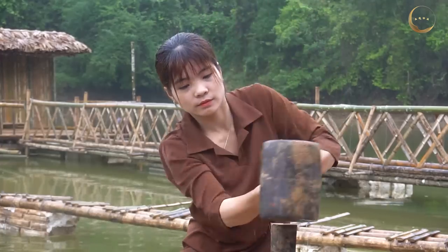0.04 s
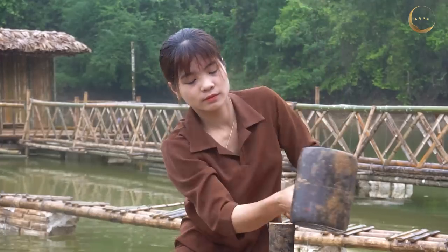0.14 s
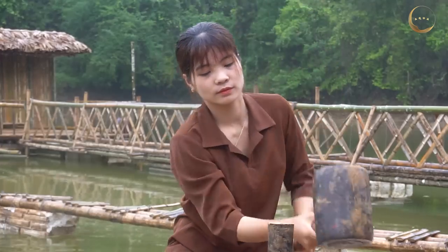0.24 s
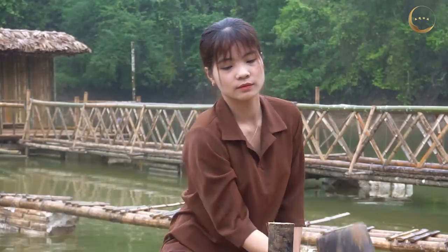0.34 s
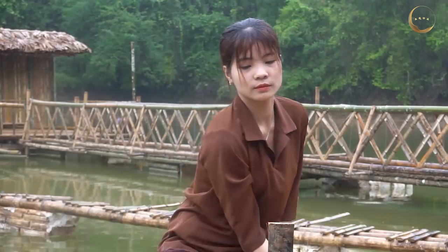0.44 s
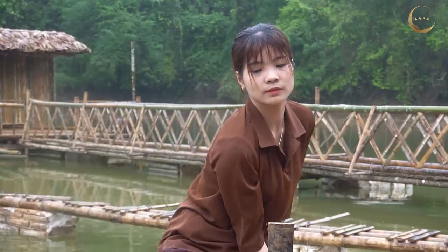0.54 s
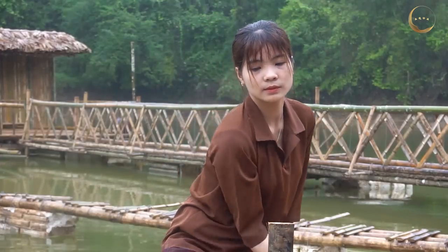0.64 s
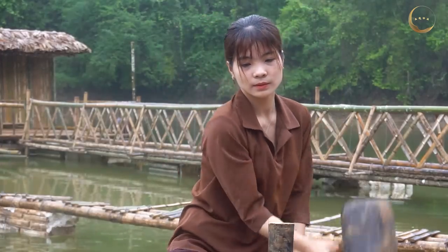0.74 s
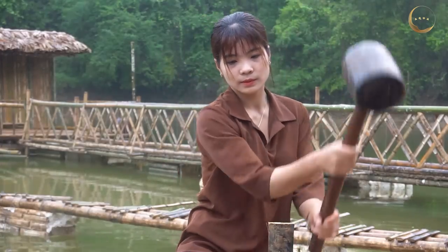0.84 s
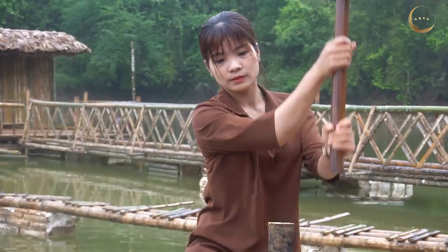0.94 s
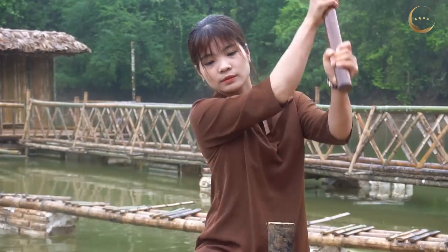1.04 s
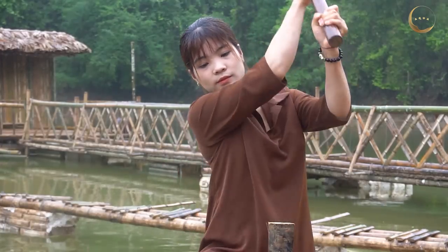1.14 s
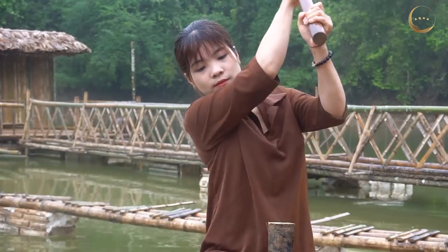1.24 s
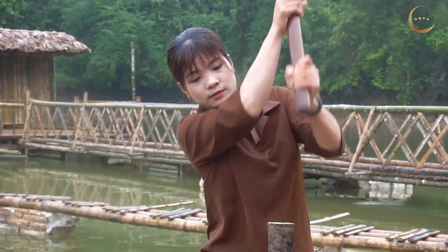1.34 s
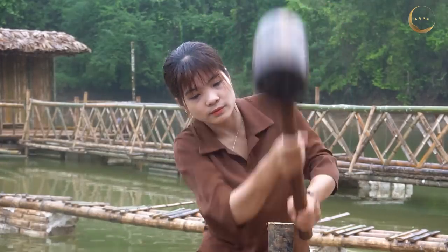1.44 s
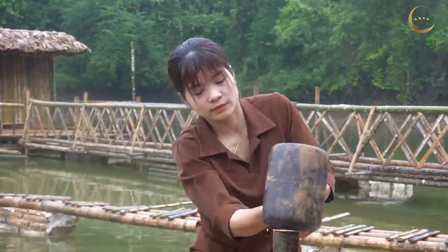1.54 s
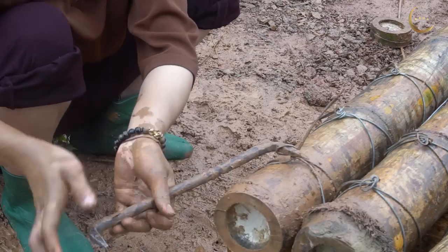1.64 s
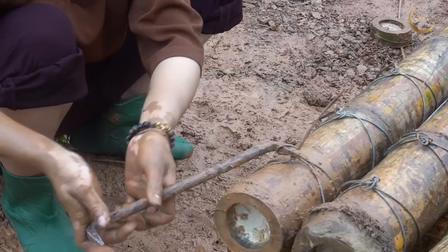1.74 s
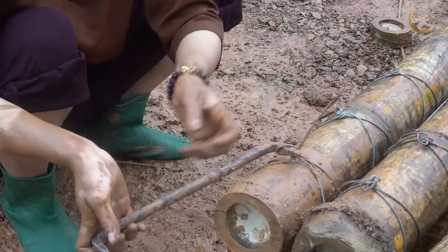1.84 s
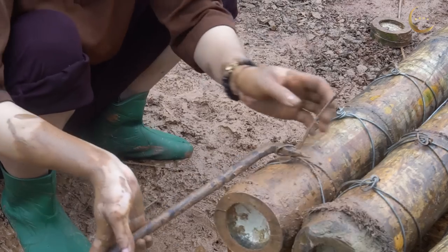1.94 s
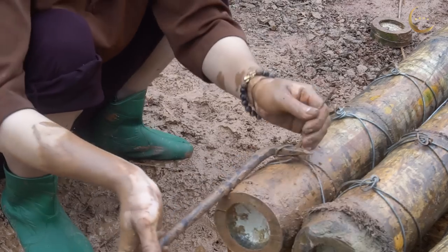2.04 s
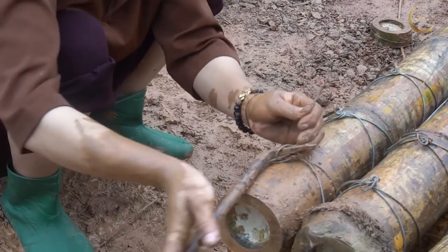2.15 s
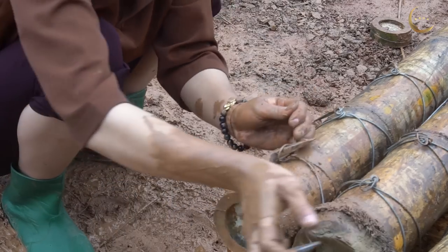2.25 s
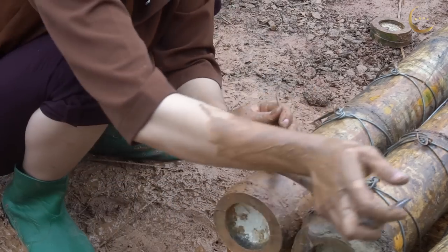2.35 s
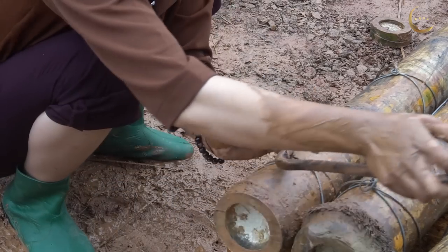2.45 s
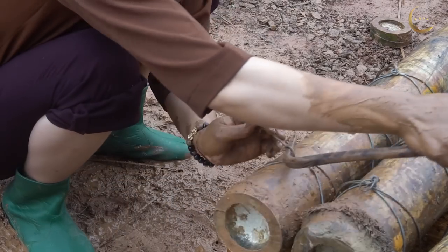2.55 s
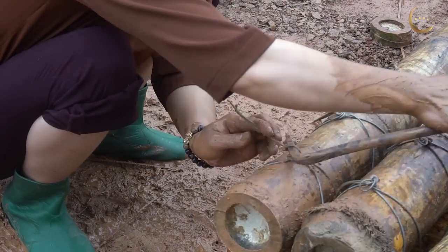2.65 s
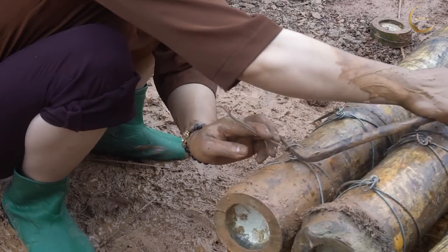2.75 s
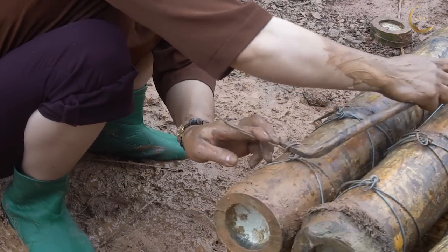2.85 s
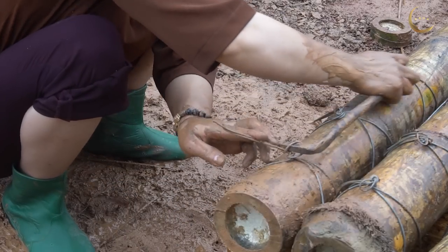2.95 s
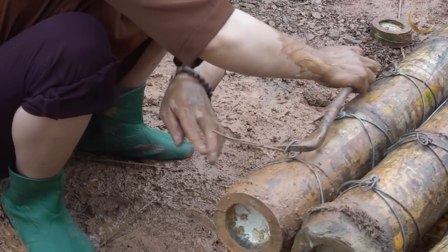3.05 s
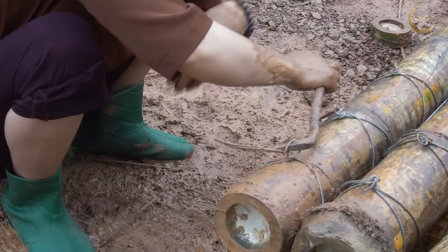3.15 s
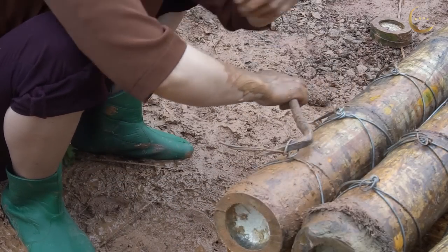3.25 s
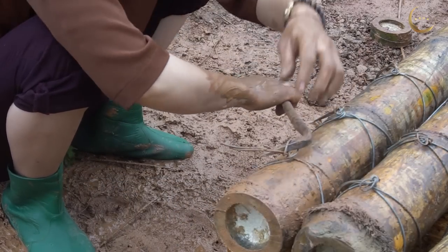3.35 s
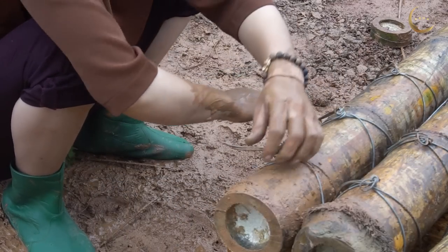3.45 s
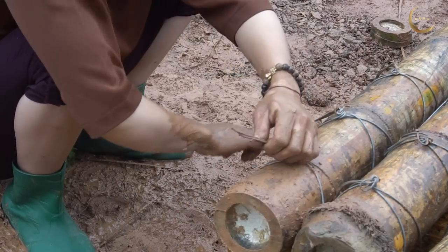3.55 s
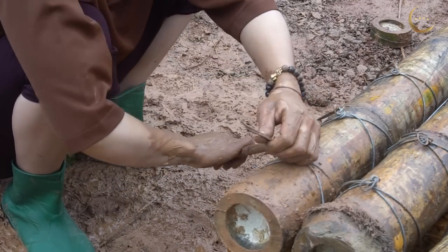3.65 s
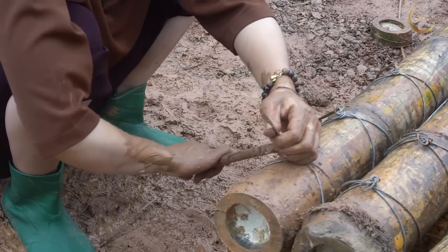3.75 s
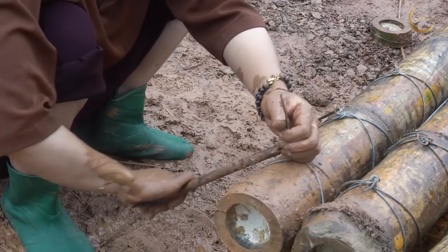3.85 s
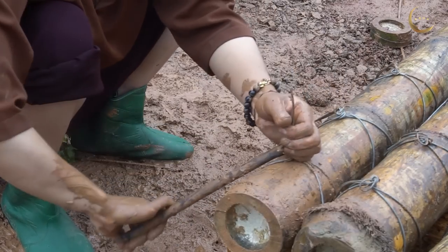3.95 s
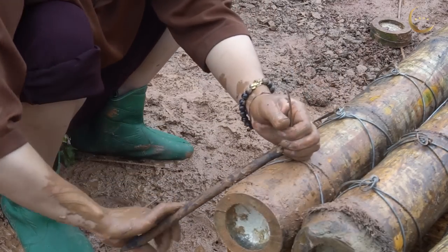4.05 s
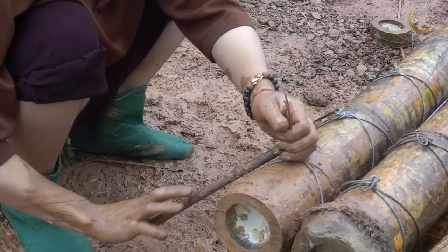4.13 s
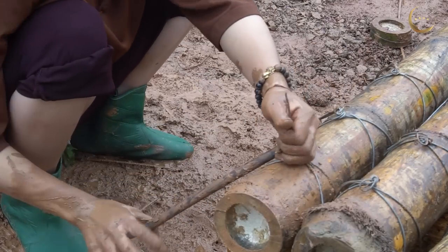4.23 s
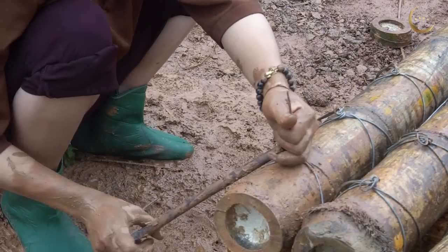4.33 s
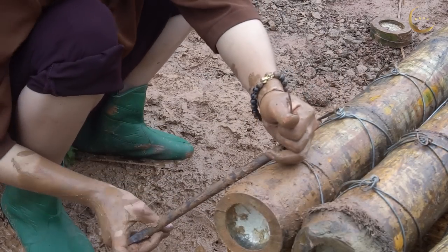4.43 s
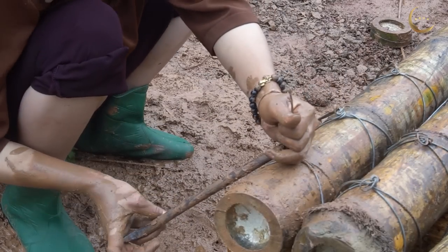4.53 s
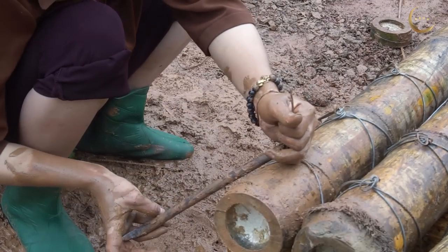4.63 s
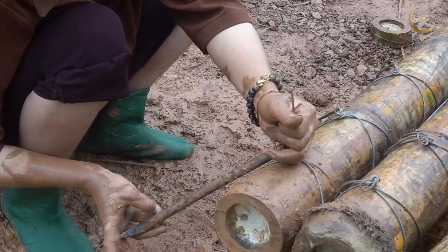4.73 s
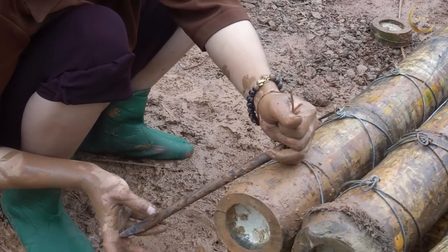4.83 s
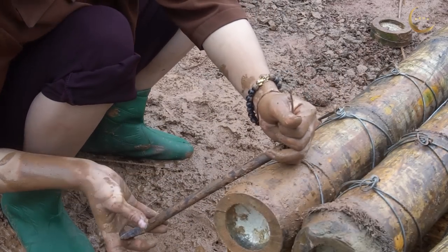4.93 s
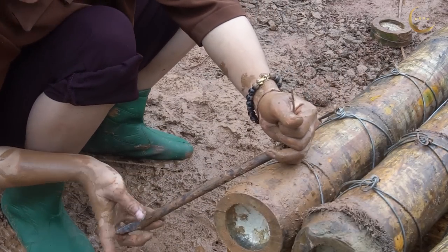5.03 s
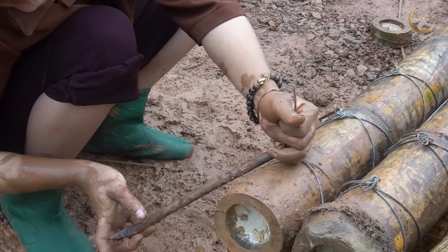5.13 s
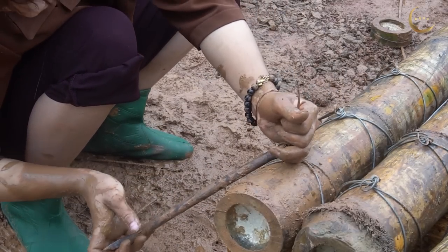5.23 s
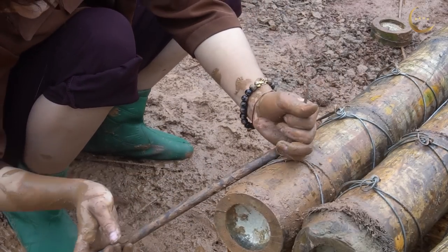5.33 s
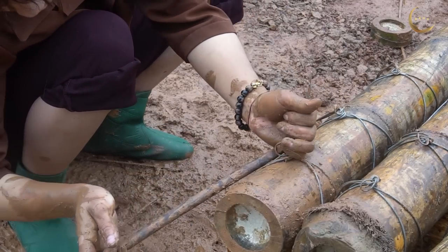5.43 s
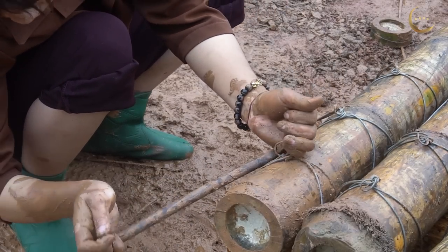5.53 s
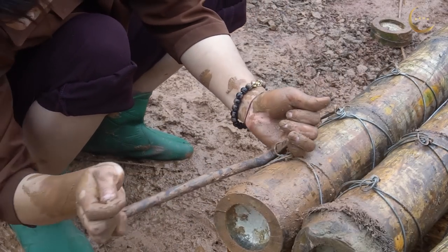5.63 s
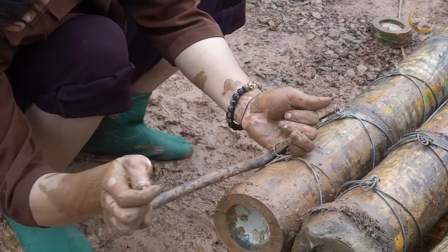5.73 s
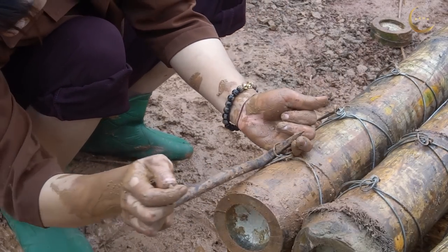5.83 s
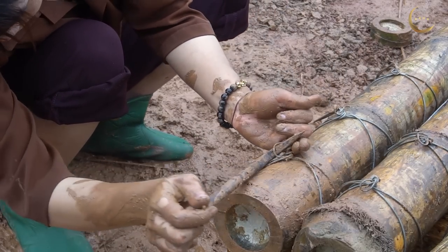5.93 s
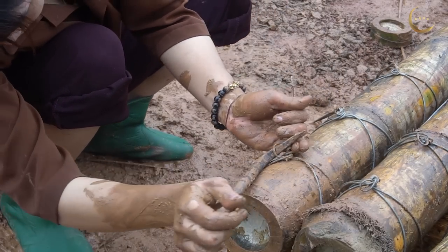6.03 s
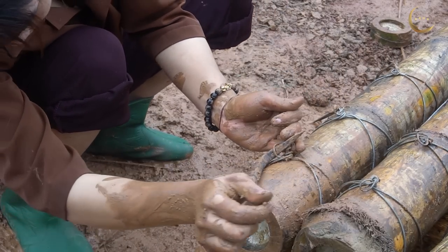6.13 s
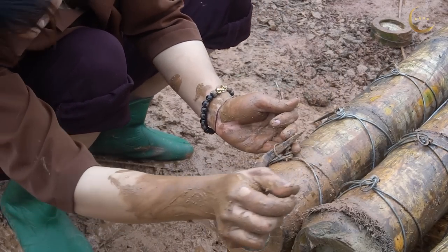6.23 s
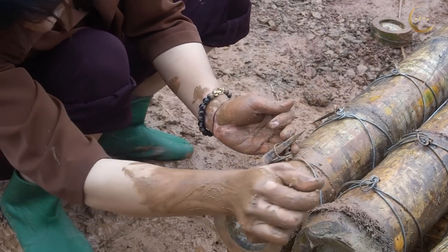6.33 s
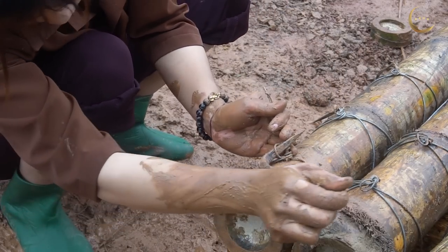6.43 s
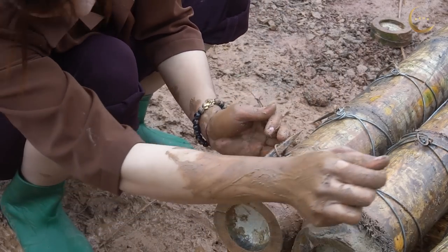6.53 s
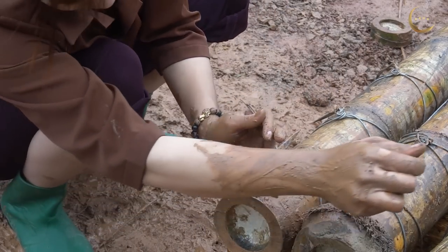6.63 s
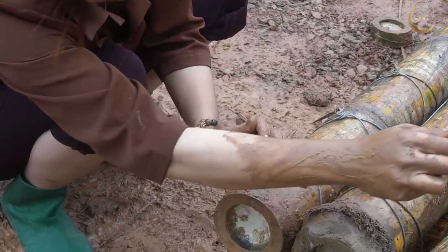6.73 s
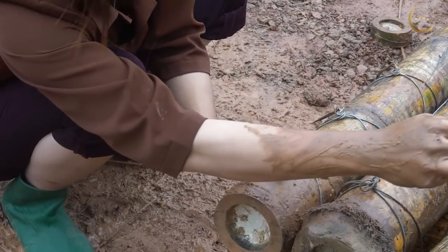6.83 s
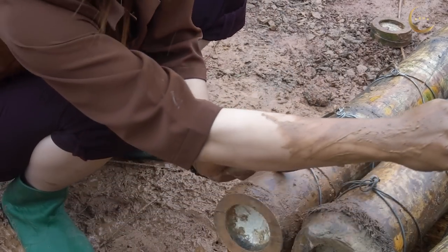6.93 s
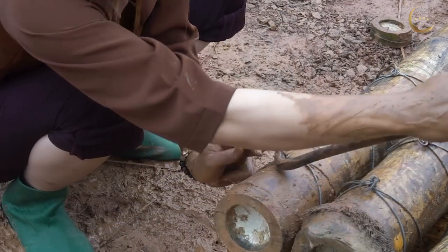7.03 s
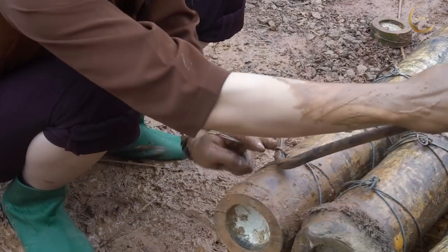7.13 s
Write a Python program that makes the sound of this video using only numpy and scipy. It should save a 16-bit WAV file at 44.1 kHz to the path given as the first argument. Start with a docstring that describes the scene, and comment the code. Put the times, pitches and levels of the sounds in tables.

```python
"""Beside a pond a mallet drives a bamboo post twice, each blow a rough contact that rings the post's modes.
Then the scene cuts abruptly to hands at the logs, twisting wire round bamboo with a steel rod: knocks ring
rod and hollow log, drags and thuds are uneven noise through resonances, ticks are tiny noise puffs.
Crickets chirp in paired falling tones and small birds peep far off, over outdoor noise with the blow's
late echo and rustle as the hands work."""
import sys
import numpy as np
from scipy import signal
from scipy.io import wavfile
from scipy.ndimage import uniform_filter1d

SR = 44100
rng = np.random.default_rng(int(sys.argv[2]) if len(sys.argv) > 2 else 0)


def put_to_file(sound):
    """Save the sound as 16-bit audio at rate SR, in the file named by the first command-line argument."""
    columns = np.atleast_2d(sound).T  # one column per channel
    safe = np.clip(columns, -1, 1)
    whole_steps = np.round(safe * 32767)
    wavfile.write(sys.argv[1], SR, whole_steps.astype(np.int16))


N = 316638

CUT_S = 1.631  # the scene cuts abruptly from the pond to the logs
EDGE_HZ, EDGE_SOFT_HZ = 16500, 15750  # band limit, and the step down just below it

# Distant crickets blurred together. Each row: time in seconds, level in dB.
CHORUS_LEVEL = [(0, -74.5), (1.6, -71.5), (1.64, -70.5), (4.3, -73), (4.8, -71), (7.18, -72.5)]
# Outdoor noise with the blow's late echo and rustle as the hands work, strongest in the treble.
# Each row: time in seconds, rise over the base level in dB at full share.
AIR_RUSTLE = [(0, 7), (.3, 14), (.7, 8.5), (1.6, 7.5), (2.3, 10.5), (3, 6), (3.5, 6), (3.85, 12),
              (4.4, 8.5), (4.9, 5), (5.6, 10.5), (6.3, 8.5), (7.18, 6.5)]
# Likeness of the air in both ears. Each row: frequency in Hz, likeness from 0 to 1.
AIR_LIKENESS = [(60, 1), (400, 0.058), (15000, 0.19)]
# Lean of the air to one side. Each row: frequency in Hz, left over right in dB.
AIR_LEAN = [(300, -1.5), (3000, 1.5), (10000, 3.5)]
# Colour of the air beside the pond. Each row: frequency in Hz, level in dB over the base level.
POND_AIR_COLOUR = [(30, -45), (150, -30.5), (570, -12), (2500, -12), (6000, -16.5), (7000, -19.5),
                   (9700, -21), (15500, -28.5)]
# Colour of the air at the logs. Each row: frequency in Hz, level in dB over the base level.
LOG_AIR_COLOUR = [(30, -46.5), (150, -26.5), (940, -9.5), (1400, -13.5), (3500, -11.5), (6000, -17),
                  (7000, -21), (11700, -22), (15500, -24)]
AIR_DB = -73  # base level

# Cricket songs. Each row: singer, first chirp in seconds, last chirp in seconds, full level in dB.
CRICKET_SONGS = [("pond", 0.0, 0.079, -47.5), ("pond", 0.178, 0.352, -54.5), ("pond", 0.421, 1.5115, -49),
                 ("low", 0.037, 0.41, -56.5), ("low", 0.596, 1.515, -56.5), ("near", 1.203, 1.875, -41.5),
                 ("near", 2.387, 3.0997, -41), ("near", 3.572, 4.2376, -41), ("near", 4.803, 5.5075, -41.5),
                 ("near", 6.082, 6.6596, -40.5), ("middle", 1.913, 2.035, -48.5),
                 ("middle", 2.117, 2.296, -48.5), ("middle", 2.34, 2.558, -47.5),
                 ("middle", 2.601, 3.137, -49.5), ("middle", 3.1783, 4.249, -47),
                 ("middle", 4.289, 4.5439, -48.5), ("middle", 4.731, 5.512, -47),
                 ("middle", 5.5529, 6.658, -48.5), ("middle", 6.696, 7.158, -47.5)]
# Wing strokes by singer. Each row: start in Hz, fall in Hz, length in seconds, delay of the second stroke in
# seconds, left over right in dB, first chirp against full level in dB, length of the first stroke as a
# share of the second, octave in dB.
WING_STROKES = {"pond": (6238.5, 191, 0.0005, 0.09, 2.5, -4.5, .99, -27.5),
                "low": (5221, 119.5, 0.0072, 0.07, 4, -6, 1.2, -25.5),
                "near": (6329, 380.5, 0.0171, 0.0178, 31, -9, 0.81, -27),
                "middle": (6199.5, 768.5, 0.0189, 0.0034, 15.5, -4, 1.064, -21.5)}
# Wider spacing at the ends of a song, by singer. Each row: extra gap at the start in seconds, at the end in
# seconds, before the song is stretched to fit its first and last chirp.
SONG_SLOWING = {"pond": (.004, 0.004), "low": (.002, .002), "near": (.008, .0008), "middle": (0, .003)}
CHIRP_S = .0413  # usual time from chirp to chirp, before that stretch
SWELL_S = 0.117  # a song swells to full level
WARM_S, TIRE_S = .12, .12  # how long the slow start and end last

# Bird peeps that arch up and down. Each row: start in seconds, level in dB.
ARCHED_PEEPS = [(5.755, -63), (6.037, -64), (6.44, -64.5), (6.808, -65.5), (7.115, -64)]
# Whistles and glides of birds, and one high insect sweep (the first row).
# Each row: start in seconds, length in seconds, from Hz, to Hz, level in dB.
WHISTLES_AND_SWEEP = [(.37, 0.069, 9620, 10950, -64.5), (.45, .09, 3820, 5234, -69.5),
                      (0.477, .035, 1145, 2194, -66), (1.19, 0.048, 3250, 3000, -69.5),
                      (3.35, 0.113, 2948, 3177, -71), (5.261, 0.113, 2913, 3160, -67.5),
                      (5.55, 0.041, 2985, 3043, -65.5), (6.73, 0.147, 2950, 3240, -71),
                      (6.95, 0.077, 3050, 3059, -71.5)]
# Runs of a high insect rasp. Each row: first in seconds, end of the run in seconds, opening level in dB.
RASP_RUNS = [(0.183, 0.19, -59.5), (0.529, 1.25, -58)]
# Far blurred calls. Each row: start in seconds, length in seconds, level in dB.
BLURRED_CALLS = [(1.7, 0.285, -69.5), (3.7, 0.224, -67), (6.04, .36, -74.5)]
CALLS_HZ = 1692  # centre of the blurred calls
PEEP_S, PEEP_HZ, PEEP_ARCH_HZ = .045, 3593, 1276
CHEEP_START_S, CHEEP_GAP_S, CHEEP_S, CHEEP_DB = 4.043, .1285, .022, -63.5
CHEEP_HZ = 4385, 3300  # each cheep falls
RASP_S, RASP_HZ = .024, (10100, 9410)  # each rasp falls
RASP_GAP_S, RASP_FADE_DB_PER_S = 0.14, -17.5
RASP_LEAD_S, RASP_LEAD_DB = 0.046, -6.5  # a weak rasp ahead of each strong one

# Drags of rod and wire, and the thuds and woody tails of knocks. Each row: start in seconds, rise in seconds,
# fall in seconds, rumble in dB, rasp in dB, hiss in dB, log hum in dB, wire in dB.
DRAGS_AND_THUDS = [(2.116, 0.0152, 0.304, -64, -59, -63, -60, -71.5),
                   (3.128, 0.011, .08, -64, -53, -80.5, -61.5, -79.5),
                   (3.63, 0.0139, 0.109, -61, -62, -60, -73, -75),
                   (5.337, 0.0082, 0.0544, -58, -63, -78, -69, -80.5),
                   (5.389, 0.0039, 0.222, -61.5, -57, -51, -68.5, -56.5),
                   (5.58, 0.2004, 0.085, -60.5, -61.5, -65.5, -74, -69),
                   (5.838, 0.0112, 0.076, -50.5, -68, -84.5, -68.5, -84.5)]
# Body resonances, two for the rumble, then two for the rasp. Each row: centre in Hz, width in Hz, level in dB.
BODY_PEAKS = [(291.6, 108, -14.5), (354.7, 156, -1.5), (745, 422, -3.5), (3200, 2600, -4.5)]
# The hollow of the log. Each row: centre in Hz, width in Hz, level in dB.
LOG_HOLLOW = [(1084, 99, 0)]
# Resonances of the wire. Each row: centre in Hz, width in Hz, level in dB.
WIRE_PEAKS = [(3922, 150, -2), (4790, 670, 0.5), (7790, 100, 3), (9270, 400, -10.5)]
STROKE_FADE_DB = -26  # reached at the end of a drag or thud

# The rod knocks a log. Each row: start in seconds, steel in dB before a 3 dB cut, steel ring as a share of
# its t60, log in dB, log pitch in Hz, log ring as a share of its t60, hiss in dB, snap in dB, snap in Hz.
ROD_KNOCKS = [(2.018, -65.5, .4, -47.5, 1066, 1, -59.5, -69.5, 3400),
              (2.063, -43, 0.24, -47.5, 1100, 0.61, -40, -40, 5430),
              (3.127, -25, 0.64, -41.5, 963, 0.36, -33, -32, 4890),
              (3.244, -42, 0.21, -61, 1216, 0.28, -41.5, -39.5, 4030),
              (3.636, -47.5, 0.19, -73.5, 985, .4, -60, -56, 4100),
              (5.337, -46.5, 0.26, -45.5, 1344, 0.22, -74, -53, 3400),
              (5.3974, -40.5, 0.33, -62.5, 985, .4, -36, -37, 4940),
              (5.417, -55, .3, -65.5, 985, .4, -46, -47.5, 4600),
              (5.6294, -48, 0.23, -69, 1000, 0.42, -48, -51, 3000),
              (5.784, -53.5, 0.29, -71.5, 1000, .4, -52, -51, 3300),
              (5.838, -48, 0.22, -42.5, 1003, 0.45, -44, -34.5, 3500)]
# Modes of the steel rod. Each row: frequency in Hz, level in dB, full t60 in seconds.
ROD_MODES = [(2644, -10, 0.0266), (3008, 2, 0.0534), (4489, -0.5, 0.031), (4693, -1, 0.032),
             (5270, -5, 0.026), (6304, -1, 0.0324), (7290, -5.5, 0.03)]
# Modes of the hollow log. Each row: multiple of the log pitch, level in dB, full t60 in seconds.
LOG_MODES = [(.68, -16, 0.062), (1.001, 1, 0.061), (1.45, -17.5, .025)]
# Small dry ticks of grit and wire. Each row: start in seconds, level in dB, centre in Hz.
GRIT_TICKS = [(0.2173, -43, 11200), (1.1631, -41, 14300), (2.367, -38, 15500), (2.4908, -45.5, 10300),
              (2.081, -45, 12000), (3.5563, -46.5, 11600), (3.652, -50.5, 10000), (4.19, -50.5, 9000),
              (4.4129, -48.5, 14700), (4.5577, -44.5, 13800), (4.9044, -36.5, 14000), (4.999, -44.5, 13000),
              (5.9539, -45.5, 14500), (6.2495, -46, 12130), (6.3703, -47, 13600)]

# Mallet blows. Each row: start in seconds, level in dB, contact length in seconds, sharpness of the first
# touch, treble of the crack in dB before a 13 dB cut.
MALLET_BLOWS = [(0.1157, -18, 0.008, 0.325, 4.5), (1.5708, -17.5, 0.006, 1.14, 1.5)]
# Modes of the bamboo post. Each row: frequency in Hz, level in dB, t60 in seconds.
POST_MODES = [(291.6, -0.5, 0.0935), (746, -5.5, 0.0172), (1100, -9, 0.012), (1468, 1.5, 0.00734),
              (1810, 5, 0.0091), (2550, 2.5, 0.0067), (2965, 8, 0.0063), (3400, 8, 0.0075),
              (4100, 3, 0.0044), (5030, 1, 0.0061), (6100, 6, 0.0062), (6900, 0, 0.007)]
POST_LO_HZ = 480.5  # the thin post radiates little below this
# Single echoes of a blow, duller than the blow. Each row: delay in seconds, level against the blow in dB.
SLAP_ECHOES = [(.021, -20.5), (.035, -20), (.09, -25)]
# Dying echoes of the yard. Each row: frequency in Hz, t60 in seconds.
YARD_DECAY = [(300, 0.51), (1500, 0.215), (4000, 0.127), (10000, 0.15)]
# Echo of the far bank. The row: delay in seconds, spread in seconds, level in dB before the sender's weight.
BANK_ECHO = (0.1098, 0.0294, -14.5)
# Colour of the far bank. Each row: frequency in Hz, level in dB over that echo.
BANK_TONE = [(260, 15.5), (450, -28.5), (2000, -3), (6000, -4.5), (12000, -7.5)]


def gain_of(db):
    """Amplitude factor of a level in dB."""
    return 10 ** (np.asarray(db) / 20)


def evened(x):
    """The sound at an RMS of 1."""
    return x / np.sqrt(np.mean(x ** 2) + 1e-20)


def read(points, hz):
    """Read a curve between its points along log frequency."""
    f, value = np.transpose(points)
    return np.interp(np.log(hz + 1), np.log(f + 1), value)


def add(mix, s, sound):
    """Lay a sound into the mix at s seconds, cut at the end."""
    part = mix[..., round(s * SR):][..., :sound.shape[-1]]
    part += sound[..., :part.shape[-1]]


def band(x, lo_hz, hi_hz):
    """Keep the band between two frequencies."""
    edges = [lo_hz, min(hi_hz, .45 * SR)]
    return signal.sosfilt(signal.butter(2, edges, "band", fs=SR, output="sos"), x)


def panned(x, db):
    """Lean to the left by a level difference."""
    return x * gain_of([[db / 2], [-db / 2]])


def puff(lo_hz, hi_hz, rise_s, t60):
    """A burst of noise that rises quickly and dies."""
    t = np.arange(3000) / SR
    noise = evened(band(rng.standard_normal(3000), lo_hz, hi_hz))
    return noise * (1 - np.exp(-t / rise_s)) * gain_of(-60 * t / t60)


def ring(modes, contact_s, factor=1, lasting=1, lo_hz=190, touch=0.68, square=2.17, rise_s=.0021):
    """A short rough contact rings every mode; a small body radiates no deep bass; peak about 1."""
    t = np.arange(3000) / SR
    force = rng.standard_normal(len(t)) * np.minimum(t / rise_s, 1) * np.exp(-(t / contact_s) ** square)
    force[round(rise_s * SR)] += touch * np.linalg.norm(force)  # the first sharp touch
    body = 0
    for hz, db, t60 in modes:
        mode = gain_of(db - 60 * t / (t60 * lasting)) * np.sin(2 * np.pi * hz * factor * t)
        driven = signal.fftconvolve(force, mode)[:len(t)]
        body = body + evened(driven) * np.linalg.norm(mode)  # each mode takes its share
    out = band(band(body, lo_hz, 20000), lo_hz, 20000)
    return out / np.sqrt(2 * uniform_filter1d(out ** 2, size=180).max())


def echoes(x, bank=0):
    """Scattered reflections, unlike in each ear, dying by band, with an optional later swell from the far bank."""
    hz, t, z = signal.stft(rng.standard_normal((2, SR // 2)), SR, nperseg=128)
    z[1, hz < 500] = z[0, hz < 500]  # long waves reach both ears alike
    delay_s, spread_s, bank_db = BANK_ECHO
    near = gain_of(-60 * t / read(YARD_DECAY, hz)[:, None])
    far = gain_of(bank_db + read(BANK_TONE, hz)[:, None]) * np.exp(-.5 * ((t - delay_s) / spread_s) ** 2)
    tail = signal.istft(z * (near + bank * far), SR, nperseg=128)[1]
    return signal.fftconvolve(x[None], tail / np.sqrt(SR * 0.01125), axes=1)[:, :N]


def close(x):
    """Short scatter of opposite sign in each ear widens the treble."""
    scatter = rng.standard_normal(200) * np.exp(-np.arange(200) / 60)
    taps = band(scatter, 3240, 16300) * gain_of(-17.5) * [[1], [-1]]
    taps[:, 0] += 1  # the direct sound
    return panned(signal.oaconvolve(x[None], taps, axes=1)[:, :N], 1.66)


def air():
    """Patchy outdoor noise coloured by the place, with late echo and rustle, plus the chorus near 5.8 kHz."""
    frames, hz = N // 256 + 5, np.fft.rfftfreq(1024, 1 / SR)
    t = np.arange(frames) * 256 / SR
    a, b, c, d, patches = rng.standard_normal((frames, 513, 5)).T
    patches = evened(uniform_filter1d(uniform_filter1d(patches, 12, 0), 10, 1))
    pond_db, log_db = read(POND_AIR_COLOUR, hz)[:, None], read(LOG_AIR_COLOUR, hz)[:, None]
    colour_db = np.where(t < CUT_S, pond_db, log_db)
    share = read([(200, 0.202), (2000, 0.632), (8000, 0.851)], hz)[:, None]  # the treble rises most
    rustle_db = share * np.interp(t, *np.transpose(AIR_RUSTLE))
    chorus_db = np.interp(t, *np.transpose(CHORUS_LEVEL)) - 12 * ((hz[:, None] - 5800) / 600) ** 2
    size = np.hypot(gain_of(colour_db + AIR_DB + rustle_db), gain_of(chorus_db))
    size = size * gain_of(2.343 * patches)
    same = read(AIR_LIKENESS, hz)[:, None]
    lean = gain_of(read(AIR_LEAN, hz) / 2)[:, None]
    left = a + 1j * b
    right = same * left + np.sqrt(1 - same ** 2) * (c + 1j * d)
    z = np.array([left * lean, right / lean])
    return signal.istft(z * size, nperseg=1024, noverlap=768)[1][:, 512:N + 512]


def whistle(length, from_hz, to_hz, db, arch_hz=0):
    """A near sine that glides, or arches up and down."""
    u = np.arange(0, 1, 1 / (length * SR))
    hz = from_hz + (to_hz - from_hz) * u ** .75 + arch_hz * (1 - abs(2 * u - 1))
    flutter = gain_of(3.64 * evened(band(rng.standard_normal(len(u)), 30, 150)) - 1.5)  # the far tone breaks up
    tone = np.sqrt(2) * gain_of(db) * np.sin(2 * np.pi * np.cumsum(hz) / SR)
    return tone * signal.windows.tukey(len(u), .3) * flutter


def birds_and_high_insects():
    """Near-sine bird peeps, whistles and cheeps, calls of narrow noise, a high insect sweep and rasp, all wet."""
    out = np.zeros(N)
    for s, *call in WHISTLES_AND_SWEEP:
        add(out, s, whistle(*call))
    for s, db in ARCHED_PEEPS:
        add(out, s, whistle(PEEP_S, PEEP_HZ, PEEP_HZ, db, PEEP_ARCH_HZ))
    for k in range(6):
        add(out, CHEEP_START_S + k * CHEEP_GAP_S, whistle(CHEEP_S, *CHEEP_HZ, CHEEP_DB))
    for s, length, db in BLURRED_CALLS:
        n = round(length * SR)
        blur = evened(band(rng.standard_normal(n), CALLS_HZ - 160, CALLS_HZ + 160))
        add(out, s, gain_of(db) * np.hanning(n) ** .5 * blur)
    for first, last, db in RASP_RUNS:
        for s in np.arange(first, last, RASP_GAP_S):
            for lead in (0, 1):
                level_db = db + RASP_FADE_DB_PER_S * (s - first) + lead * RASP_LEAD_DB
                add(out, s - lead * RASP_LEAD_S, whistle(RASP_S, *RASP_HZ, level_db))
    return panned(out, 2.2) + gain_of(-1.5) * echoes(out)


def chirps(first, last, start_s, end_s):
    """Times of the chirps of one song, further apart as it starts and ends."""
    s = np.arange(round((last - first) / CHIRP_S)) * CHIRP_S
    gaps = CHIRP_S + start_s * np.exp(-s / WARM_S) + end_s * np.exp(-s[::-1] / TIRE_S)
    return first + np.r_[0, np.cumsum(gaps)] * (last - first) / gaps.sum()


def cricket(name):
    """Each chirp is two wing strokes, each a tone that falls in pitch, with a weak octave."""
    hz, fall_hz, length, gap, left_db, first_db, short, octave_db = WING_STROKES[name]
    out = np.zeros(N)
    for first, last, db in [row[1:] for row in CRICKET_SONGS if row[0] == name]:
        for at in chirps(first, last, *SONG_SLOWING[name]):
            level_db = db + first_db * np.exp(-(at - first) / SWELL_S)
            for stroke in (0, 1):
                lasts = length * (short, 1)[stroke]
                u = np.arange(0, 1, 1 / (lasts * SR))
                slip, tune, loud, wobble = rng.standard_normal(4)  # no two strokes are alike
                turns = np.cumsum(hz * (1 + 0.00594 * tune) - fall_hz * u) / SR
                tone = np.sin(2 * np.pi * turns) + gain_of(octave_db) * np.sin(4 * np.pi * turns)
                shape = np.sqrt(np.sin(np.pi * u)) * (1 + 0.18 * np.sin(2 * np.pi * (2.3 * u + wobble)))
                start_s = max(at - lasts / 2 + stroke * gap + .0009 * slip, 0)
                add(out, start_s, gain_of(level_db + 1.66 * stroke + 1.44 * loud) * shape * tone)
    direct = out * gain_of([[0], [-left_db]])
    return direct + gain_of(-11) * echoes(out) * gain_of([[0], [-.5 * left_db]])  # echoes lean half as much


def shaken(slips, peaks):
    """Uneven noise heard through a set of resonances."""
    return evened(sum(gain_of(db) * evened(band(slips, hz - width / 2, hz + width / 2))
                      for hz, width, db in peaks))


def drags_and_thuds():
    """Noise with uneven slips shakes the log's body, the wire and the grit, in long drags or short thuds."""
    out = np.zeros(N)
    for s, rise_s, fall_s, rumble_db, rasp_db, hiss_db, hum_db, wire_db in DRAGS_AND_THUDS:
        t = np.arange(0, rise_s + fall_s, 1 / SR)
        n = len(t)
        fade_db = STROKE_FADE_DB * (np.maximum(t - rise_s, 0) / fall_s) ** 1.63
        stroke = np.minimum(t / rise_s, 1) * gain_of(fade_db)
        jerks = gain_of(2.3 * rng.exponential(1, n)) * (rng.random(n) < 300 / SR)  # about 300 a second
        slips = rng.standard_normal(n) * (1.28 + uniform_filter1d(jerks, size=120) * 50)
        grit = evened(band(slips, 2500, 12000))
        sound = gain_of(rumble_db) * shaken(slips, BODY_PEAKS[:2])
        sound += gain_of(rasp_db) * shaken(slips, BODY_PEAKS[2:])
        sound += gain_of(hiss_db) * grit
        sound += gain_of(hum_db) * shaken(slips, LOG_HOLLOW)
        sound += gain_of(wire_db) * shaken(slips, WIRE_PEAKS)
        add(out, s, sound * stroke)
    return close(out)


def knocks():
    """The steel rod and the hollow log ring together at each knock; ticks are tiny puffs."""
    out = np.zeros(N)
    for s, steel_db, free, log_db, log_hz, lasting, hiss_db, snap_db, snap_hz in ROD_KNOCKS:
        add(out, s, gain_of(steel_db - 3.0) * ring(ROD_MODES, 0.0086, lasting=free, lo_hz=900))
        add(out, s, gain_of(log_db) * ring(LOG_MODES, 0.00827, log_hz, lasting, 0.5 * log_hz))
        add(out, s, gain_of(snap_db) * puff(0.752 * snap_hz, 1.273 * snap_hz, 0.00117, 0.0335))
        add(out, s, gain_of(hiss_db) * puff(3700, 16000, 0.00083, 0.0288))
    for s, db, hz in GRIT_TICKS:
        add(out, s, gain_of(db) * puff(0.798 * hz, 1.53 * hz, 0.00069, 0.0126))
    return close(out) + gain_of(-11) * echoes(out)


def mallet():
    """Each blow rings the post, cracks and thumps; echoes follow until the cut."""
    out, sent = np.zeros(N), np.zeros(N)  # heard directly, and sent to the echoes
    for s, db, contact_s, touch, treble_db in MALLET_BLOWS:
        crack = gain_of(-5) * puff(1254, 4440, 0.00037, 0.054)
        crack += gain_of(treble_db - 13) * puff(4940, 15600, 0.00104, 0.0484)
        blow = ring(POST_MODES, contact_s, lo_hz=POST_LO_HZ, touch=touch, square=4.7, rise_s=0.0009994)
        tap = ring(POST_MODES, 0.00125, lo_hz=POST_LO_HZ, touch=3.4, rise_s=0.0010155)
        add(out, s, gain_of(db) * blow)
        add(out, s, gain_of(db) * crack)
        thump = gain_of(db - 27.5) * puff(165.5, 361, 0.0082, 0.132)  # the post jolts the ground
        add(out, s, thump)
        add(sent, s, thump)
        even_tap = tap * np.linalg.norm(blow) / np.linalg.norm(tap)
        add(sent, s + contact_s / 2, gain_of(db) * even_tap)  # the yard hears one even tap
        for delay_s, slap_db in SLAP_ECHOES:
            add(out, s + delay_s, gain_of(db + slap_db) * puff(800, 3900, 0.00194, 0.053))
    heard = close(out) + gain_of(-8.0) * echoes(sent, bank=1.266)
    return heard * np.clip((CUT_S - np.arange(N) / SR) / 0.00067, 0, 1)


def scene():
    """Air, birds and insects behind the work on the logs and the mallet."""
    after_cut = np.arange(N) / SR > CUT_S  # the near singer is heard only after the cut
    crickets = cricket("pond") + cricket("near") * after_cut + cricket("middle") + cricket("low")
    return air() + birds_and_high_insects() + crickets + drags_and_thuds() + knocks() + mallet()


def record(dry):
    """The microphone cuts deep bass; the top of the treble steps down, then meets the band limit."""
    dry = signal.sosfilt(signal.butter(2, 60, "high", fs=SR, output="sos"), dry)
    step_hz = [0, EDGE_SOFT_HZ - 150, EDGE_SOFT_HZ + 150, SR / 2]
    edge = signal.firwin2(511, step_hz, [0.915, 1, .08, .08], fs=SR)
    edge = np.convolve(edge, signal.firwin(511, EDGE_HZ, window=("kaiser", 9), fs=SR))
    return signal.oaconvolve(dry, edge[None], "same")


dry = scene()
out = record(dry)
put_to_file(out)
```